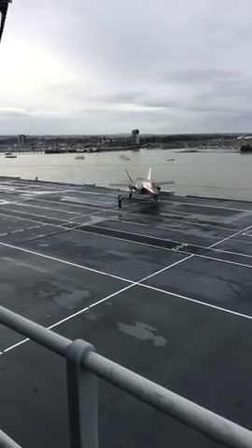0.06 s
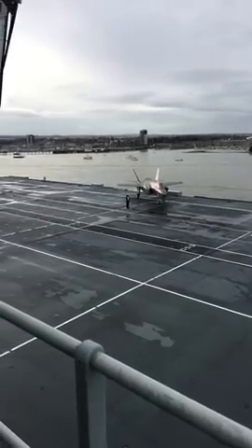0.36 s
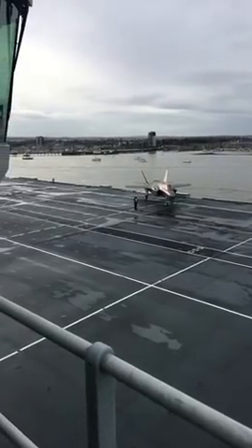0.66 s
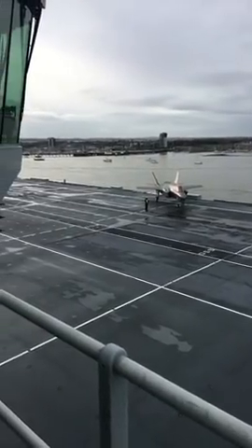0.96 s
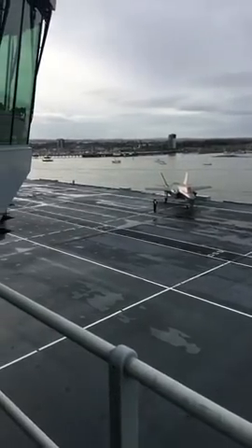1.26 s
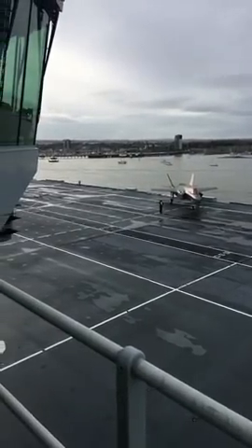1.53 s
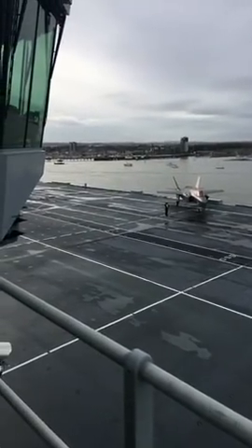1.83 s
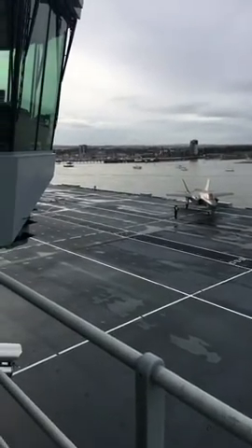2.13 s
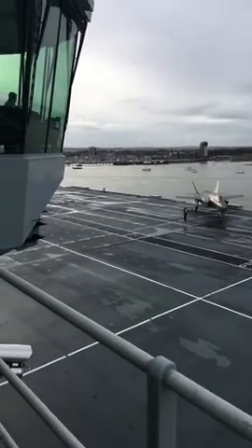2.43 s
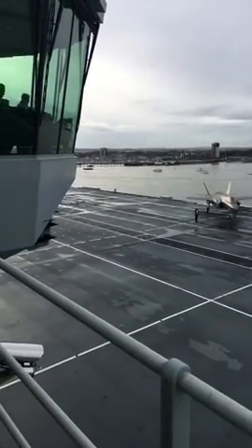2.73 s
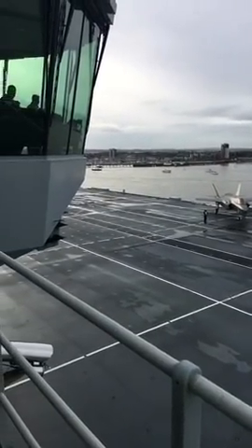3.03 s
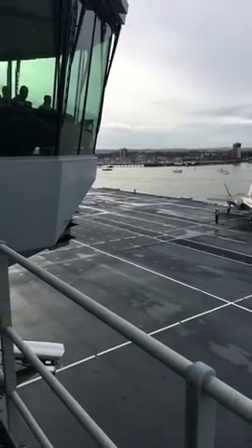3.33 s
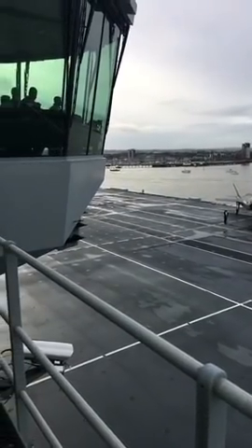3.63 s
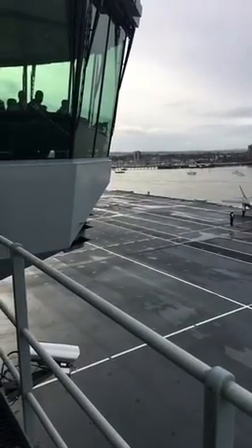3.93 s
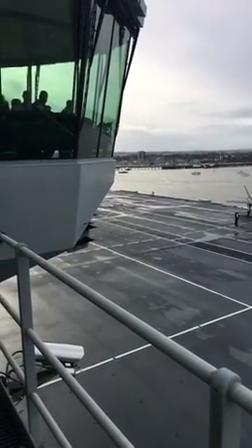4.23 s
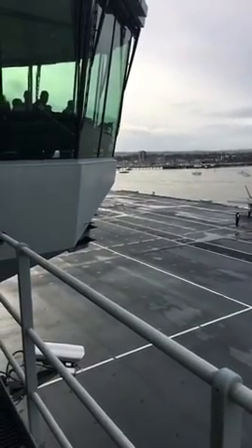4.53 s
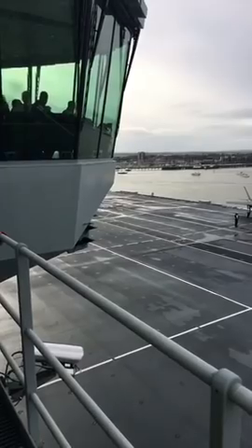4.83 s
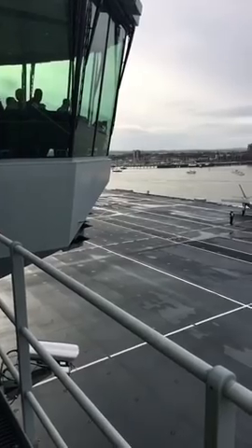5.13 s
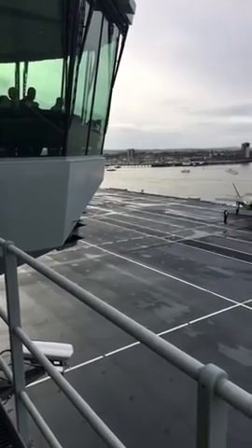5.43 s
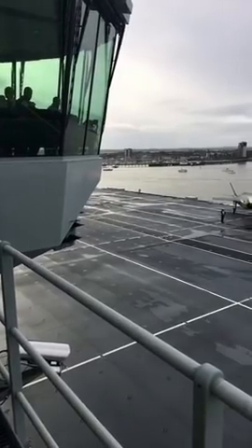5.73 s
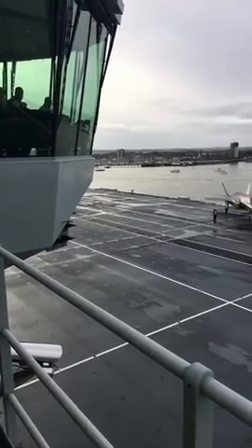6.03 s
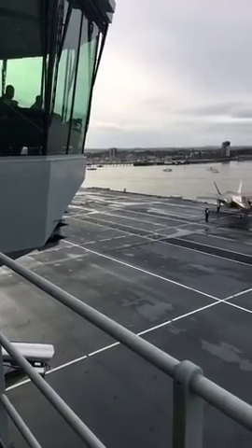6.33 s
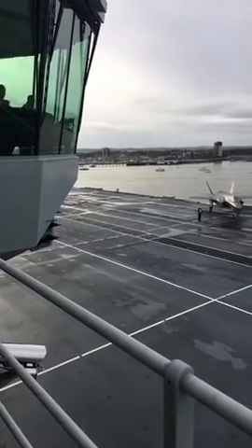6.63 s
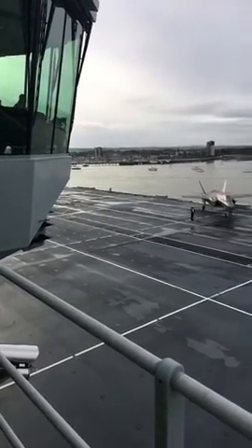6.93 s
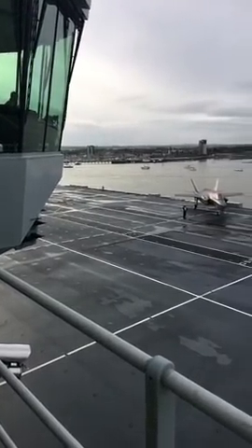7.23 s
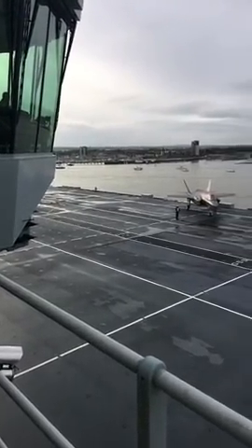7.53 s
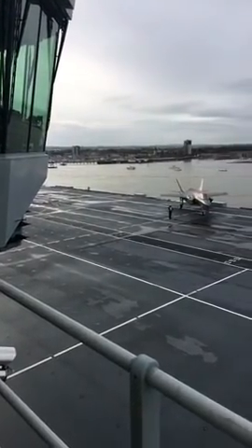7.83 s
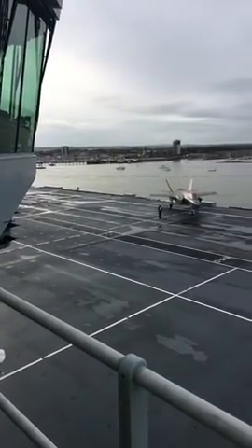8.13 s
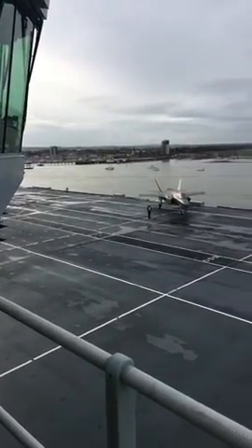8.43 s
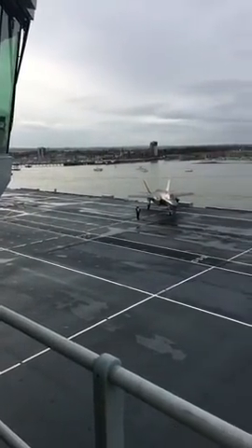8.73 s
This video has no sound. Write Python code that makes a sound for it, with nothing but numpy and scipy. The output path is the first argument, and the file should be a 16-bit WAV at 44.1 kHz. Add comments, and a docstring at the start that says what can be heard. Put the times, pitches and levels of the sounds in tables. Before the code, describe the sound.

From the first moment a jet fighter idles on an open carrier deck, heard from a gallery above. A shrill, high whine and several thin, fluttering tones ride on a rushing exhaust roar and a fine hiss. Underneath, the ship's machinery gives a constant low drone and rumble. The engine holds its pitch throughout. At about 2.2 seconds the hiss flares briefly. Between roughly 2 and 4 seconds the microphone turns away toward a steel wall, so the roar gently changes colour and a higher tone in the whine comes forward. The whine swells slightly near 4.7 seconds. Around 5.8 seconds, as the microphone swings partly back, a faint hollow hum that had been fading returns and the earlier tone comes back. The whine, roar and drone continue steadily until the end, near 9 seconds.

```python
"""A fighter jet idles on an open carrier deck, heard from a gallery on the ship's island.
From the start, compressor blades shriek over clean shaft tones, exhaust roars and hisses, the ship drones.
A steel edge adds a 2 ms echo whose notches glide as the phone turns away; the hiss flares at 2.2 s.
Near 4.7 s the phone is fully turned, a steel wall recolours the exhaust and the shriek swells.
The phone then swings partly back, and a hollow hum that had been fading returns near 5.8 s."""
import sys
import numpy as np
from scipy import signal
from scipy.fft import rfft, irfft
from scipy.io import wavfile
from scipy.ndimage import uniform_filter1d, minimum_filter1d, map_coordinates

SR = 44100
rng = np.random.default_rng(int(sys.argv[2]) if len(sys.argv) > 2 else 0)


def dump_mix(stems):
    """Bounce the given channels to the path in sys.argv[1] as a 16-bit WAV at rate SR."""
    frames = np.atleast_2d(stems).T  # one column per channel
    limited = np.clip(frames, -1, 1)  # hard clip at full scale
    pcm = np.round(limited * 32767).astype(np.int16)
    wavfile.write(sys.argv[1], SR, pcm)


N = 386757
TIME_S = np.arange(N) / SR
FREQ_HZ = np.arange(N // 2 + 1) * SR / N


# Blade tones smeared by turbulence: f/Hz, half width/Hz, relative level/dB
BLADE_PEAKS = [(3614, 173, -44), (3600, 50, -51.5), (3721, 62, -42), (3840, 78, -49), (4020, 110, -55.5),
               (3300, 200, -64)]

def compressor(turn):
    """Blades chop uneven intake air: a shriek that wavers on the breeze and gains grazing the wall."""
    grazing_db = 1.5 * np.sin(np.pi * turn)
    breeze_db = .38 * walk(2.5)
    swell_db = bump(at_s=4.67, half_length_s=.38, peak_db=2.2)
    shriek = turbulence(resonances(BLADE_PEAKS))
    flutter_db = .64 * walk(45)
    return shriek * undb(-1.5 + grazing_db + breeze_db + swell_db + flutter_db)


# Sounding multiples of the shaft rate
SHAFT_ORDERS = [10, 19, 20, 29, 30]
# One tone per order: rms level/dB, gain when turned away/dB, pitch wander from the air/fraction
SHAFT_TONES = [(-46.5, 3, 0.00043), (-34.5, -5, 0.000507), (-47.5, 0, .0005), (-33.5, 6, 0.000703),
               (-42, 0, 0.0013)]

def shaft(turn, shaft_hz=128.92):
    """Clean shaft harmonics; eddies on the way make each swell and flutter on its own."""
    out = 0
    for order, (level_db, turned_db, wander) in zip(SHAFT_ORDERS, SHAFT_TONES):
        harmonic = tone(order * shaft_hz, level_db + turned_db * turn, wander)
        eddies_db = 1.5 * walk(3.06) + 2.5 * walk(18)
        out = out + harmonic * undb(eddies_db)
    return out


# Exhaust roar spectrum: f/Hz, density level/dB
ROAR_SPECTRUM = [(200, -75), (280, -73), (345, -65.5), (420, -65.5), (560, -65.5), (900, -58.5),
                 (1100, -65), (1550, -61.5), (2000, -57.5), (2600, -54.5), (2950, -61), (4200, -60),
                 (4750, -89)]
# Turbine howl: f/Hz, half width/Hz, density level/dB
TURBINE_PEAKS = [(1212, 28, -58), (1812, 84, -56), (2164, 177, -50), (2370, 89, -57)]

def exhaust(turn):
    """The exhaust's broad turbulent roar and the howl of the turbine stages."""
    roar = wall_reflection(turbulence(slopes(ROAR_SPECTRUM)), turn) * undb(.35 * walk(20))
    howl = turbulence(resonances(TURBINE_PEAKS)) * undb(.6 * walk(30))
    return roar + howl


def hollow_hum(centre_hz=458, half_width_hz=21, start_db=-59.5, fade_db_per_s=1, late_db=-58.5):
    """A narrow band in the roar fades steadily, returns quickly and holds."""
    returned = rise(TIME_S, centre=5.75, width=.15)
    fading_db = start_db - fade_db_per_s * TIME_S
    level_db = (1 - returned) * fading_db + returned * late_db
    return turbulence(resonances([(centre_hz, half_width_hz, 0)])) * undb(level_db)


# Treble hiss spectrum, with a narrow gap near 4.8 kHz typical of audio coding: f/Hz, relative level/dB
HISS_SPECTRUM = [(3500, -74.5), (4450, -64), (4780, -99.5), (5050, -65.5), (5650, -70), (6330, -62.5),
                 (6800, -65.5), (8300, -67), (9000, -70.5), (9700, -79.5), (10450, -83), (11000, -99)]

def treble_hiss(turn, facing_db=.5, turned_db=-1):
    """Fine eddies at the nozzle hiss, flaring once and weakening as the phone turns away."""
    flare_db = bump(at_s=2.19, half_length_s=.22, peak_db=2.5)
    hiss = turbulence(slopes(HISS_SPECTRUM))
    flutter_db = .5 * walk(35)
    return hiss * undb(facing_db + turned_db * turn + flare_db + flutter_db)


# Machinery rumble spectrum: f/Hz, density level/dB
RUMBLE_SPECTRUM = [(24, -71), (33, -62), (60, -64.5), (140, -68.5), (190, -73.5), (400, -86)]
# Hull resonances: f/Hz, half width/Hz, density level/dB
HULL_PEAKS = [(36.9, 5, -50.5), (59, 9.1, -56), (87, 8, -59.5), (113, 7, -61.5), (138.7, 9, -61.5)]

def ship():
    """Machinery drones and rumbles in the hull's low resonances."""
    rumble = turbulence(slopes(RUMBLE_SPECTRUM))
    hull = turbulence(resonances(HULL_PEAKS))
    drone = tone(hz=37, rms_db=-45, wander=.02)
    return rumble + hull + drone


# Wall colouring when fully turned: f/Hz, gain/dB
WALL_RESPONSE = [(300, 1), (440, -3), (570, 4.5), (720, 2.5), (850, -6), (1050, 5.5), (1230, 3), (1380, 1),
                 (1750, 1), (2900, -2.5), (6400, 0.5), (7050, -2), (7600, 0)]

def wall_reflection(x, turn):
    """Reflections from the steel wall recolour a sound as the phone turns towards it."""
    hz, gain_db = np.transpose(WALL_RESPONSE)
    reflected = colour(x, undb(np.interp(FREQ_HZ, hz, gain_db)))
    return (1 - turn) * x + turn * reflected


def edge_echo(x, lag_ms, share):
    """Sound bent round a steel edge arrives late and inverted, cutting a comb of notches."""
    delayed_index = np.arange(N) - lag_ms * SR / 1000
    return x - share * map_coordinates(x, [delayed_index], order=3, mode="reflect")


def turbulence(density):
    """Random pressure with the given amplitude density."""
    return colour(rng.standard_normal(N) * np.sqrt(SR / 2), density)


def tone(hz, rms_db, wander):
    """A sine whose pitch wanders by a small fraction."""
    phase = 2 * np.pi * np.cumsum(hz * (1 + wander * walk(12))) / SR
    return np.sqrt(2) * undb(rms_db) * np.sin(phase)


def slopes(points):
    """Gain spectrum through (f/Hz, level/dB) points, falling 20 dB per octave outside them."""
    hz, db = np.transpose(points)
    f_hz = np.maximum(FREQ_HZ, 1)
    octaves_outside = np.maximum(np.log2(hz[0] / f_hz), 0) + np.maximum(np.log2(f_hz / hz[-1]), 0)
    return undb(np.interp(np.log(f_hz), np.log(hz), db) - 20 * octaves_outside)


def resonances(peaks):
    """Gain spectrum of steep-sided peaks whose powers add."""
    gains = (undb(db) / (1 + ((FREQ_HZ - hz) / half_width_hz) ** 2) for hz, half_width_hz, db in peaks)
    return np.sqrt(sum(gain ** 2 for gain in gains))


def colour(x, gain):
    """Filter by a gain spectrum."""
    return irfft(rfft(x) * gain, N)


def walk(rate_hz):
    """Random steps, smoothed twice, with unit spread."""
    hold = max(int(SR / rate_hz), 2)
    steps = np.repeat(rng.standard_normal(N // hold + 2), hold)
    steps = steps[rng.integers(hold):][:N]
    smooth = uniform_filter1d(uniform_filter1d(steps, hold), hold)
    return smooth / smooth.std()


def bump(at_s, half_length_s, peak_db):
    """A bell-shaped swell in dB."""
    return peak_db * np.exp(-((TIME_S - at_s) / half_length_s) ** 2)


def rise(x, centre, width):
    """A smooth step from 0 to 1."""
    return .5 + .5 * np.tanh((x - centre) / (2 * width))


def undb(db):
    """Decibels to gain."""
    return 10 ** (np.asarray(db) / 20)


def limiter(x, ceiling_db, window_samples=221):
    """The gain ducks for a few milliseconds round each peak above the ceiling."""
    allowed_gain = np.minimum(1, undb(ceiling_db) / (np.abs(x) + 1e-9))
    return x * uniform_filter1d(minimum_filter1d(allowed_gain, window_samples), window_samples)


# Phone's swing away from the jet: t/s, fraction of full swing
PHONE_SWING = [(0, 0), (1.2, .2), (3.5, .85), (4.8, 1), (6.2, .58), (7.2, .42), (8.77, .34)]

def scene():
    """The engine with its near echo over the ship; the hiss has a weaker echo from a nearer edge."""
    swing = np.interp(TIME_S, *np.transpose(PHONE_SWING))
    lag_ms = 2.44 - .24 * swing
    turn = rise(swing, centre=.67, width=.12)  # 0 facing the jet, 1 facing the wall
    shriek = edge_echo(compressor(turn), lag_ms, share=.41)
    engine = edge_echo(shaft(turn) + exhaust(turn) + hollow_hum(), lag_ms, share=.29)
    hiss = edge_echo(wall_reflection(treble_hiss(turn), turn), lag_ms - .55, share=.13)
    return (shriek + engine + hiss + ship())[None]


def record(dry, low_cut_hz=29, high_cut_hz=10650):
    """The phone drops the deepest bass, holds down the highest peaks and cuts the top."""
    highpass = signal.butter(6, low_cut_hz, "high", fs=SR, output="sos")
    lowpass = signal.ellip(10, .1, 80, high_cut_hz, fs=SR, output="sos")
    limited = limiter(signal.sosfilt(highpass, dry), ceiling_db=-3.4)
    return signal.sosfilt(lowpass, limited)


dry = scene()
out = record(dry)
dump_mix(out)
```